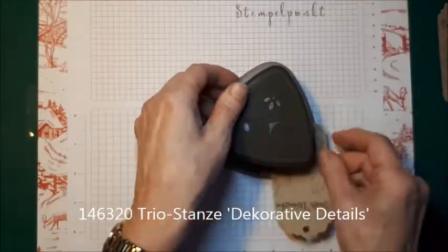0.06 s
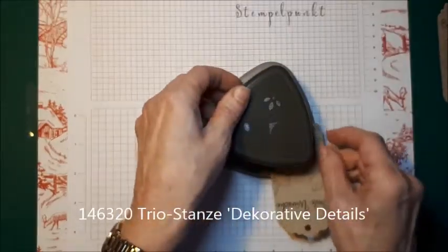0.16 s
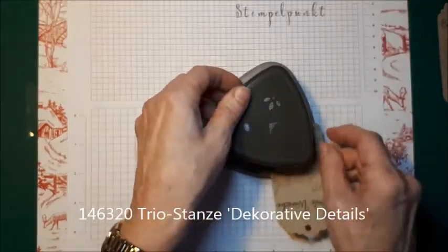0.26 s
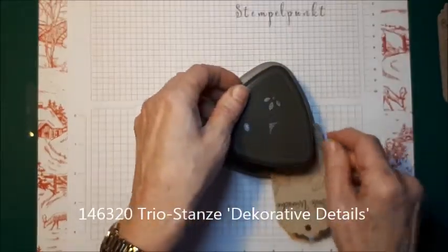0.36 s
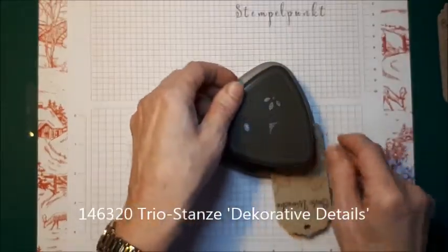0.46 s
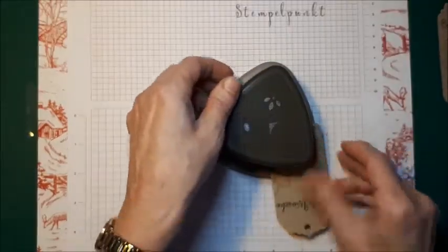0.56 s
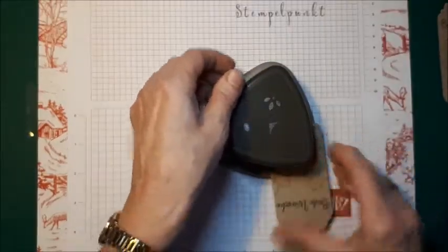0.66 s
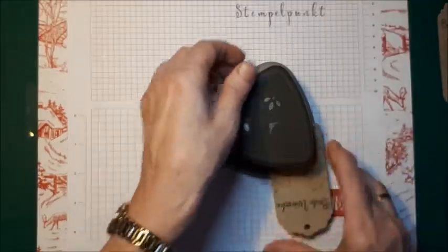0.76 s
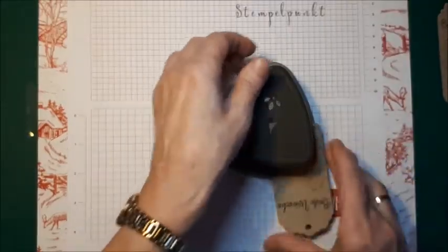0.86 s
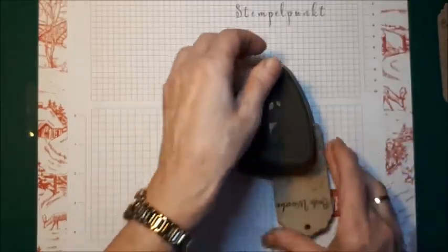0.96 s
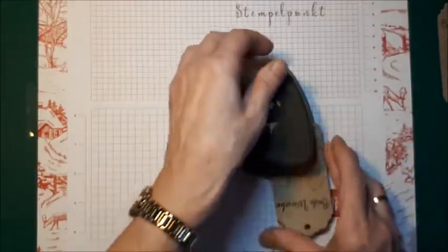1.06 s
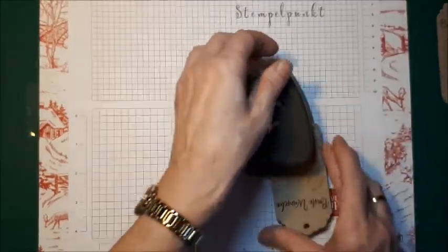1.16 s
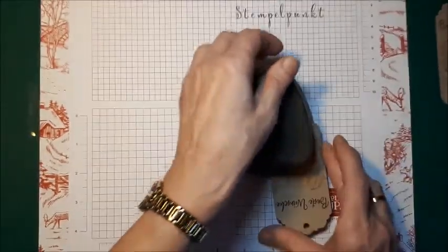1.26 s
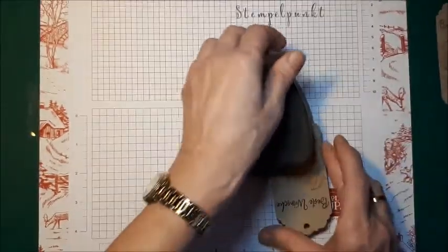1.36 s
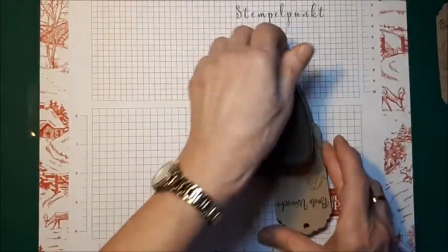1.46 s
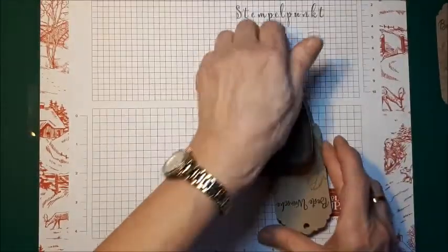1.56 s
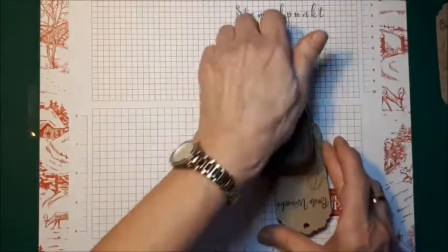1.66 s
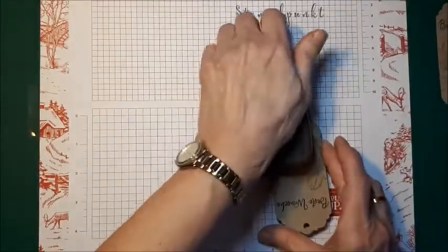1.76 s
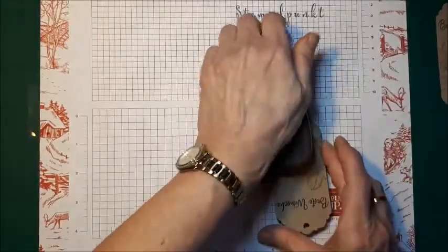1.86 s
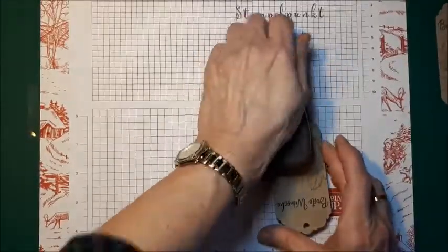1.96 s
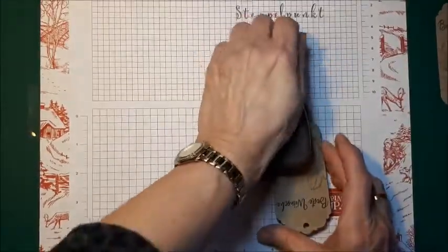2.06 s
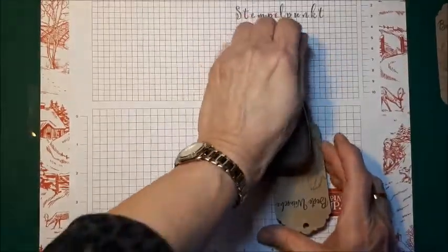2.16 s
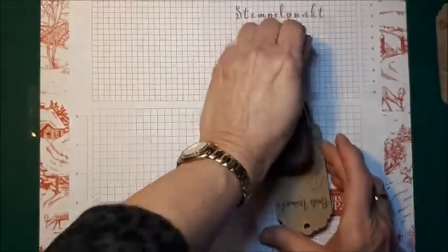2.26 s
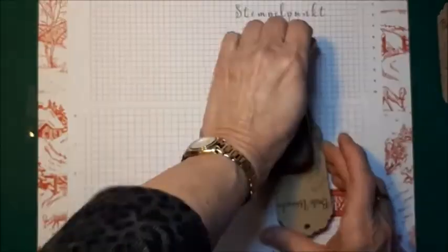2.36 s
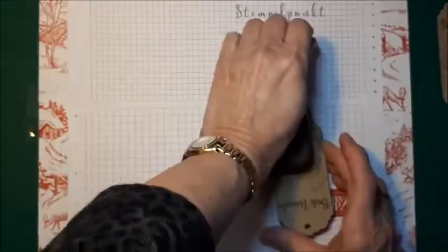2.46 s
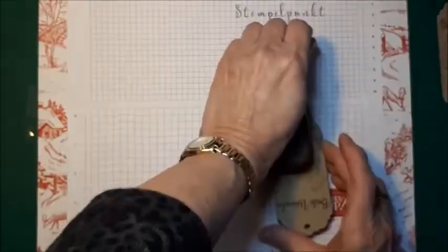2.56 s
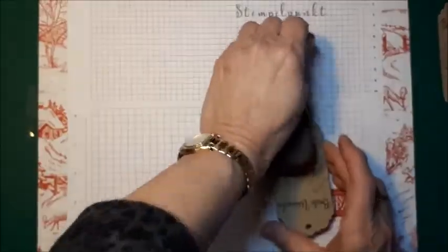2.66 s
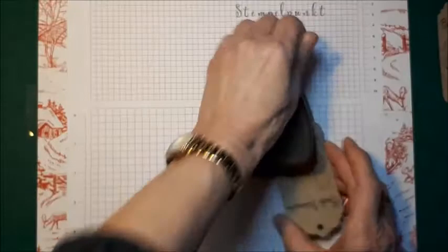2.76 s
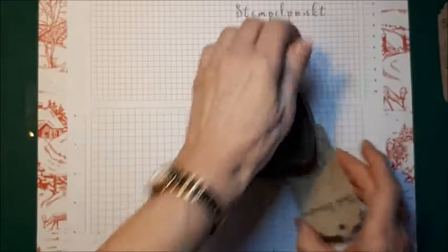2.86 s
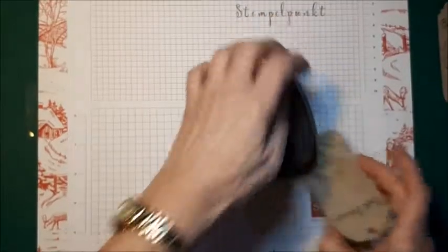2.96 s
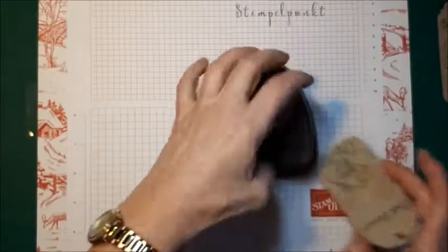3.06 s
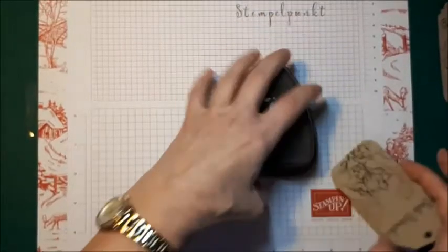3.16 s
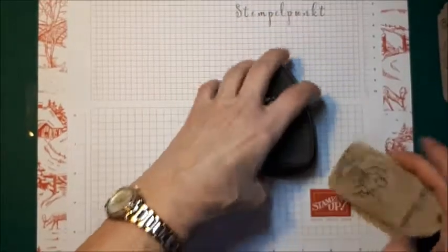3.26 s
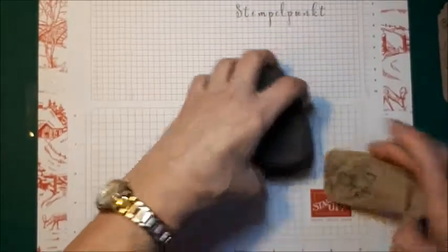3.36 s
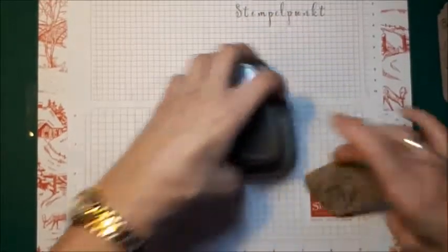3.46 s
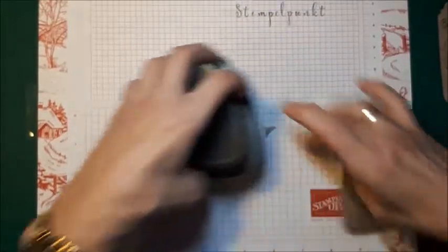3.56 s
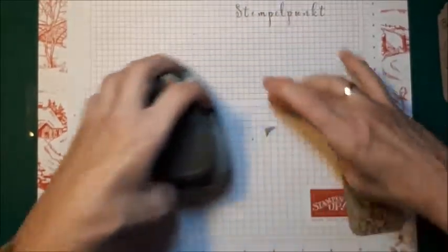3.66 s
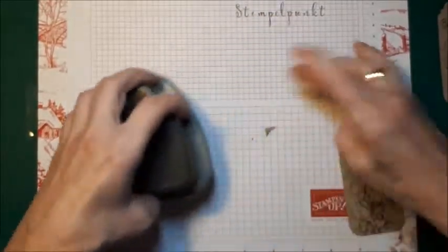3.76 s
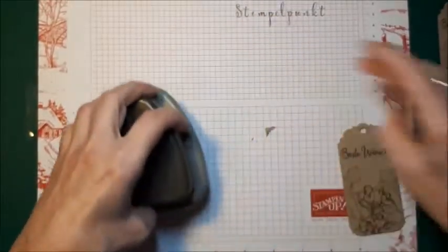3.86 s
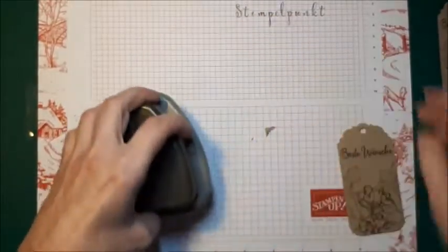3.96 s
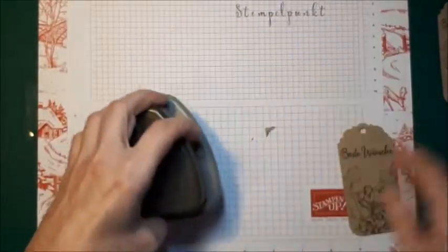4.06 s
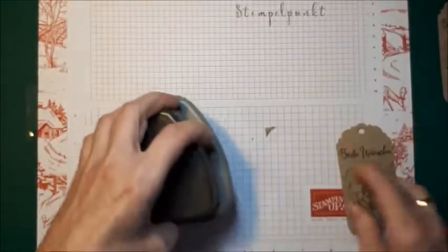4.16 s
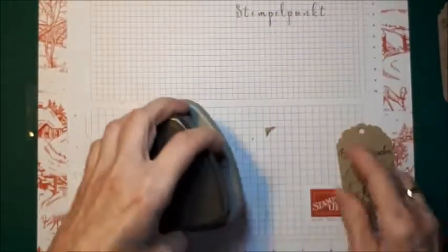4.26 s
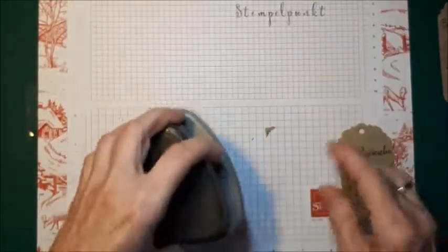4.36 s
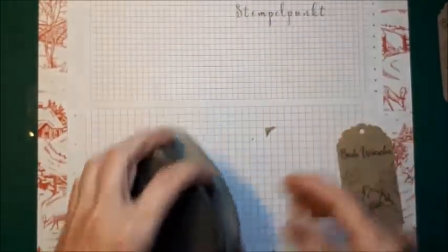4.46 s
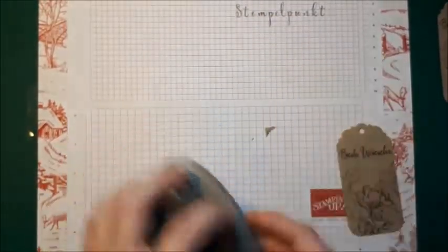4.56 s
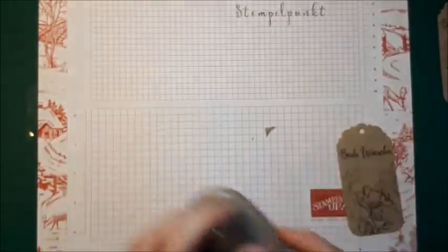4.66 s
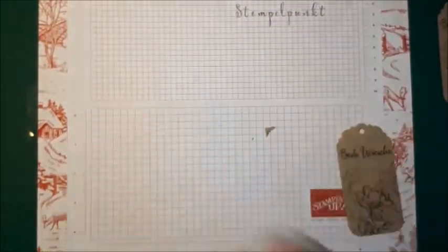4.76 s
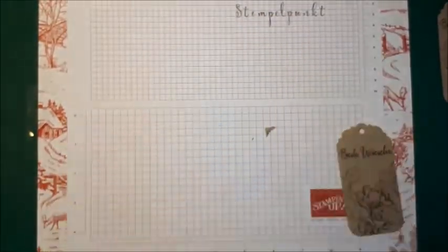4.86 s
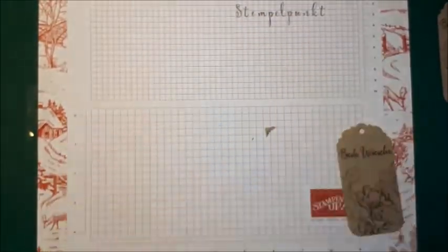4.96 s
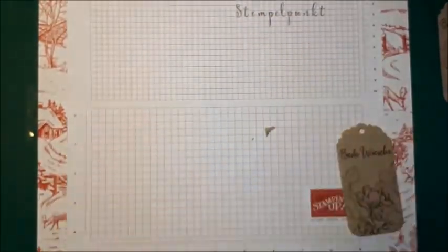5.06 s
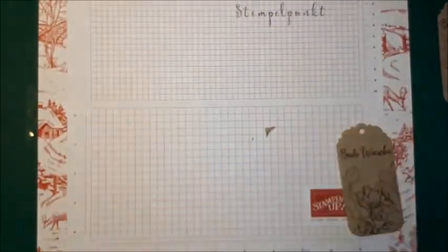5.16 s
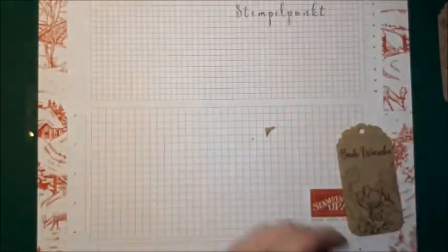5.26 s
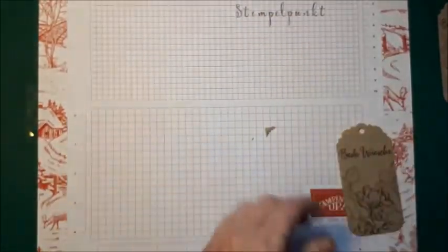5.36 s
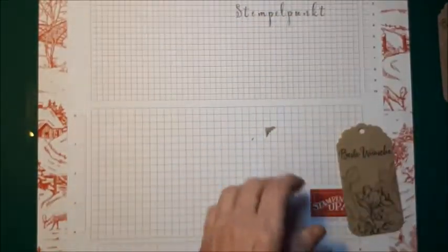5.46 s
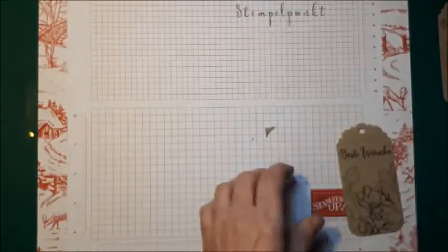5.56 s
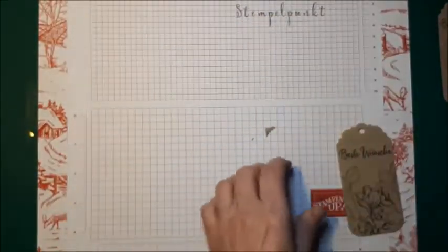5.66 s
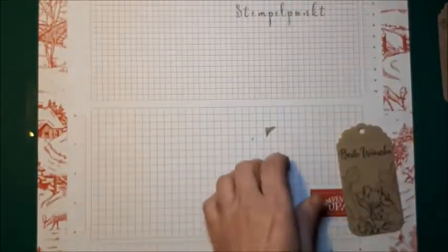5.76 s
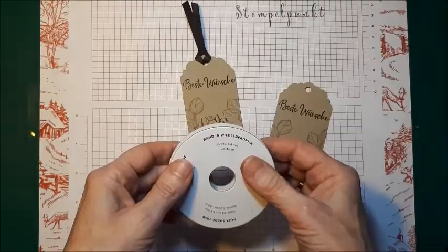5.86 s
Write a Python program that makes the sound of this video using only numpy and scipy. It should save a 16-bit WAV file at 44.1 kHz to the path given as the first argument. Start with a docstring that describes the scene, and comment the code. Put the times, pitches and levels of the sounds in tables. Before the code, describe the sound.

A card tag scuffs lightly on a paper pad. A hand presses a plastic corner punch, whose lever creaks in quickening, knocking jerks until the steel die snaps through the card with a brief ring. The lever springs back with a click. Card, punch and hands then tap, slide and rub softly on the padded table, all close to the microphone in a quiet, faintly humming room.

```python
"""Light scuffs and taps of a card tag on a paper pad, close by. A hand then presses a plastic corner punch:
the lever creaks and slips in jerks that knock the shell, the steel die snaps through the card and rings,
the spring sings and returns. Card, punch and hands scuff and tap the padded table again, and the punch's
cavity rubs over cloth with a rising hollow note. A quiet room hums underneath."""
import sys
import numpy as np
from scipy import signal
from scipy.fft import rfft, irfft, next_fast_len
from scipy.io import wavfile
from scipy.ndimage import map_coordinates

SR = 44100
rng = np.random.default_rng(int(sys.argv[2]) if len(sys.argv) > 2 else 0)


def transcribe(signal):
    """Save signal, clipped to [-1, 1], as a 16-bit WAV file at the path in sys.argv[1]."""
    frames = np.atleast_2d(signal).T
    limited = np.clip(frames, -1, 1)
    pcm = np.round(limited * 32767).astype(np.int16)
    wavfile.write(sys.argv[1], SR, pcm)


N = 260190

# lever slips: t/s, level/dB, knock f/Hz, decay/cycles, crack/dB, rattle/dB (last two re level)
LEVER_JERKS = [(1.4888, -49, 370, 1.2, -18.5, -16), (1.5501, -42.5, 440, 1.7, -26, -21),
               (1.6163, -51, 290, 1.4, -32, -9), (1.7674, -41.5, 310, 0.69, -26, -6),
               (1.7902, -28.5, 890, 1.25, -19, -10), (1.818, -34, 975, 2, -27, 0.5),
               (1.9124, -41.5, 530, 2.9, -15, -5), (1.9502, -26.5, 770, 0.73, -26, -1.5),
               (1.9659, -38, 505, 2.1, -16, 8.5), (2.015, -16.5, 753, 2.1, -16.5, -14.5),
               (2.0663, -23, 780, 0.88, -32.5, -8.5), (2.0823, -25, 450, 1, -30.5, -11),
               (2.1077, -12.5, 756, 1.36, -19.5, -11), (2.1268, -26, 725, 1.3, -20, -13.5),
               (2.132, -17.5, 685, 1.2, -13.5, -14), (2.1776, -11.5, 737, 1.9, -17.5, -17.5),
               (2.2155, -9.5, 785, 1.5, -16, -9), (2.2222, -14.5, 490, 1.05, -8, -18),
               (2.2266, -23.5, 160.7, 1.3, -14.5, -13), (2.2543, -8.5, 860, 1.1, -13, -11.5),
               (2.2672, -23, 600, 1.3, -9, -9.5), (2.2754, -15, 754, 1.6, -15, -12.5),
               (2.2919, -20, 450, 0.96, -9, -5), (2.2959, -12.5, 392.4, 4, -13.5, -17.5),
               (2.3166, -20, 546, 1.7, -8, -12), (2.3193, -8.5, 414, 1.3, -25, -23),
               (2.3294, -14, 412, 0.88, -2.5, -4.5), (2.3344, -15, 556, 1.5, -11.5, -4),
               (2.3421, -13, 404, 1.3, -8, -2.5), (2.3474, -12.5, 750, 1.8, -11.5, -11.5),
               (2.4754, -33, 977, 1.3, -15, -14.5), (2.5079, -51.5, 988, 1.3, -5.5, -1.5),
               (2.6156, -45.5, 930, 3, -16, 2), (2.6627, -19, 818, 3.1, 1.5, -9.5),
               (2.6808, -26.5, 830, 8.4, -2.5, -9)]
# treble of the jerks as the die bites: t/s, fizz/dB re crack
BITE_FIZZ = [(1.6, 7), (1.78, -20.5), (2.1, -15), (2.18, -1), (2.26, -13), (2.32, -6), (2.5, -11),
             (2.62, 3), (2.665, -18.5), (2.68, -28)]
# palm on the lever: t/s, card tearing/dB, table rumble/dB, shell groan/dB
PALM_PRESS = [(1.7, -86, -57, -73), (1.79, -79, -63, -61), (1.84, -65, -62, -65.5),
              (1.95, -62.5, -60.5, -41.5), (2.04, -70, -57, -69), (2.19, -56, -42, -72.5),
              (2.25, -65.5, -36, -53.5), (2.3, -46, -39.5, -24), (2.4, -61.5, -38.5, -55.5),
              (2.46, -67, -89, -98), (2.68, -89, -44.5, -46.5), (2.81, -65, -76, -93)]
# singing spring: t/s, level/dB
SPRING_LEVELS = [(2.36, -49), (2.384, -48), (2.454, -66), (2.482, -55), (2.534, -73), (2.598, -69),
                 (2.62, -60)]
# rubbed punch cavity: t/s, f/Hz, level/dB
CAVITY_GLIDE = [(5.06, 480, -64), (5.09, 546.5, -45), (5.108, 578, -59), (5.125, 620, -47.5),
                (5.14, 622, -53), (5.155, 688, -46.5), (5.18, 830, -62), (5.21, 990, -58)]
# blows on the pad: t/s, level/dB, knock f/Hz, decay/cycles, crack/dB, rattle/dB, fizz/dB (last 3 re level)
PAD_TAPS = [(.181, -51, 800, 3.8, 10.5, -15, -1), (.467, -49, 750, 2.3, -19, -5.5, -5),
            (.524, -64.5, 704, 1.6, 0, -5, 1), (2.8866, -51, 606, 1.3, 5.5, -15, 2.5),
            (2.937, -35.5, 847, 2.8, 1.5, -13, -8), (3.235, -44, 875, 2.8, 5, -6, -6),
            (3.36, -37.5, 408, 2.2, -8, -8.5, -22), (3.427, -64, 158, 1.2, 10, -12, 3),
            (3.497, -38, 493, 10.4, -12, -5, -12), (3.539, -63, 200, 1.5, -15, -18, 7.5),
            (3.556, -39.5, 136, 0.61, -29, -26, -2), (3.589, -53, 219, 2.4, -8, -13, 12),
            (4.114, -48, 231, 1.8, -15, -1.5, -7.5), (4.273, -48.5, 254, 1.98, -31.5, -14, -24.5),
            (4.57, -59.5, 229, 2.2, -12.5, -2, 6.5), (4.63, -56, 233, 4.6, 2, -4, -5),
            (4.769, -55, 405, 2.2, -13, -7, -11), (4.838, -37, 149, 0.91, -23, -10, -19),
            (4.867, -43, 227, 2, -5.5, -4.5, -14), (4.907, -39, 108, 1.4, -21, -20, -31),
            (4.96, -36, 131, 0.83, -20, -32, -28), (5.054, -50, 223, 2.9, -9, -4, -24),
            (5.394, -35.5, 343, 0.97, -15, -2.5, -6.5), (5.406, -37, 340, 1, -24, -3, -15.5),
            (5.422, -41, 221, 1.7, -27, -5, -12), (5.435, -45, 290, 1.2, -4, -33, 10),
            (5.51, -44.5, 188, 1.6, -7.5, -8, -13), (5.56, -49, 260, 2.1, -25, -5, -25.5),
            (5.618, -48, 280, 2.1, -14.5, -7.5, -25), (5.775, -52, 120.8, 2.8, -16, -4, -22.5)]
# card catching: t/s, length/s, edge/dB, flap/dB, hiss/dB
CARD_SCUFFS = [(0.058, 0.099, -64.5, -74, -69.5), (0.136, 0.069, -61.5, -71, -73),
               (0.193, 0.073, -75, -85, -94), (0.371, 0.093, -64.5, -67.5, -66),
               (0.446, 0.05, -59, -67, -84), (0.592, 0.14, -76, -70.5, -78), (0.819, 0.026, -77, -82, -77),
               (0.838, 0.16, -83.5, -92, -79), (0.967, 0.11, -80, -75, -88),
               (2.623, 0.049, -58, -55.5, -59.5), (2.786, 0.041, -65, -75, -88),
               (2.85, 0.023, -57, -67, -64), (2.877, 0.085, -51.5, -54.5, -65),
               (2.936, 0.078, -65, -58.5, -70), (3.286, 0.04, -54, -56, -64), (3.354, 0.032, -70, -52, -76),
               (3.365, 0.052, -61.5, -54, -62.5), (3.419, 0.023, -67, -64, -66),
               (3.49, 0.022, -45, -47.5, -50), (3.598, 0.087, -78, -66, -74), (4.107, 0.033, -78, -67, -60),
               (4.121, 0.12, -86, -80, -64), (4.558, 0.069, -79, -69, -66), (4.645, 0.32, -76, -88, -64.5),
               (5.108, 0.044, -66.5, -59.5, -81), (5.861, .035, -86, -75, -90)]
# hands moving over the pad: t/s, drag/dB, table rumble/dB
HAND_MOVES = [(0.0, -81, -67.5), (0.57, -83, -69), (1.08, -87, -66), (1.23, -89, -71.5), (1.5, -85, -64),
              (2.6, -87.5, -67.5), (2.84, -60, -63), (2.99, -77, -58.5), (3.24, -73, -62.5),
              (3.43, -75, -59.5), (3.6, -68.5, -56.5), (3.66, -84, -65), (4.06, -68, -55.5),
              (4.34, -83.5, -68.5), (4.55, -84, -66.5), (4.77, -55.5, -55.5), (4.95, -70, -53.5),
              (5.14, -63.5, -64), (5.34, -70, -57.5), (5.44, -61.5, -55), (5.59, -74.5, -54),
              (5.75, -80, -63.5), (5.9, -76.5, -61)]
# ring of the freed die: f/Hz, relative level/dB, t60/s
DIE_RING = [(1740, -1, .28), (2500, -5, .22), (2850, -4, .3), (3350, -11, .28), (4075, -10, .24)]
# room decay: f/Hz, t60/s
ROOM_DECAY = [(150, 0.31), (1000, 0.2), (8000, 0.28)]

# resonances: f/Hz, width/Hz, relative level/dB
SHELL_MODES = [(196, 99, -3.5), (432, 220, 0.5), (824, 310, -3.5), (986, 110, -1), (1366, 340, -12.5)]  # plastic punch shell
DIE_MODES = [(1050, 410, -6.5), (1815, 410, -4), (2370, 270, -2), (2880, 220, -9), (4050, 670, -13)]  # die in its guide
SLOT_MODES = [(747, 710, 0)]  # air in the punch's slot
EDGE_MODES = [(3756, 960, 0), (4300, 650, 1.5), (5370, 1240, -6.5), (7790, 1800, -15)]  # card's stiff edge
FLAP_MODES = [(1810, 330, 3), (2270, 430, 2), (3017, 350, -1)]  # card's free end

# noise spectra: f/Hz, relative level/dB
FIZZ_SPECTRUM = [(1760, -24.5), (3000, 3.5), (3380, -14.5), (5480, -1), (9010, -12.5), (12900, -19),
                 (16400, -30)]  # treble of a jerk
CARD_SPECTRUM = [(710, -37), (1200, -10), (1780, 0), (2220, -1), (2420, 0), (3030, -2.5), (4080, -7),
                 (4700, -11.5), (6500, -12.5), (8450, -39.5), (14300, -120)]  # card scrape
PAPER_SPECTRUM = [(2650, -35.5), (4500, -3), (9480, -3.5), (10600, -10.5), (15100, -14), (16000, -32),
                  (16400, -27)]  # paper hiss
TABLE_SPECTRUM = [(15, -56.5), (25, -23), (60, -11), (108, -2.5), (178, -1.5), (231, -8.5), (300, -9.5),
                  (390, -50.5), (660, -120)]  # table rumble
FLOOR_SPECTRUM = [(13, -50.5), (22, -33.5), (37, -15.5), (58, -7), (190, -8.5), (228, -8.5), (260, -14),
                  (322, -15), (1000, -38.5), (1120, -31.5), (1320, -42), (3380, -47.5), (9670, -35.5),
                  (16400, -47)]  # room and microphone noise


def lever():
    """The lever sticks and slips; each jerk knocks the shell and cracks the die against its guide."""
    bite_s, bite_db = np.transpose(BITE_FIZZ)
    jerks = [(s, db, hz, cycles, crack_db, rattle_db, crack_db + np.interp(s, bite_s, bite_db))
             for s, db, hz, cycles, crack_db, rattle_db in LEVER_JERKS]
    return blows(jerks, DIE_MODES, FIZZ_SPECTRUM, stop_cycles=8.3, rise_cycles=0.69, lag_s=0.0006,
                 crack_t60_s=0.023, rattle_rise_s=0.0045, rattle_t60_s=0.085, click_gain=0.6)


def die(snap_s=2.33, ring_db=-38):
    """The steel die rings briefly once through the card, each mode wavering in level."""
    out, t = np.zeros(N), np.arange(SR // 2) / SR
    for hz, mode_db, t60_s in DIE_RING:
        envelope = amp(ring_db + mode_db - 60 * t / t60_s + 1.2 * wobble(90)[:len(t)])
        add(out, snap_s, envelope * np.sin(2 * np.pi * hz * t))
    return out


def spring(pitch_hz=1000):
    """The compressed spring sings faintly while the lever is held down."""
    db, = curves(SPRING_LEVELS)
    tone = np.sqrt(2) * np.sin(phase(pitch_hz + 6 * wobble(80)))
    return gate(SPRING_LEVELS, fade_s=0.02) * amp(db + 1.5 * wobble(54)) * tone


def cavity():
    """Cloth rubs the punch's cavity: a rising noise band, with a weaker, wider one above."""
    hz, db = curves(CAVITY_GLIDE)
    bands = noise_band(hz, rate_hz=330) + amp(-11) * noise_band(2.2 * hz, rate_hz=1100)
    return gate(CAVITY_GLIDE, fade_s=0.015) * amp(db) * bands


def taps():
    """Card, punch and fingertips strike the pad; the card cracks and the paper fizzes."""
    return blows(PAD_TAPS, FLAP_MODES + EDGE_MODES, PAPER_SPECTRUM, stop_cycles=18, rise_cycles=0.71,
                 lag_s=0.0012, crack_t60_s=0.0053, rattle_rise_s=0.0023, rattle_t60_s=0.057,
                 click_gain=1.12)


def blows(rows, crack_modes, fizz_spectrum, stop_cycles, rise_cycles, lag_s,
          crack_t60_s, rattle_rise_s, rattle_t60_s, click_gain):
    """Each blow: a brief knock, then crack and fizz; loose parts rattle on in shell, crack and fizz."""
    out, t = np.zeros(N), np.arange(SR // 4) / SR
    responses = resonant(SHELL_MODES, steep=0.25), resonant(crack_modes, steep=0.43), coloured(fizz_spectrum)
    shell_noise, crack_noise, fizz_noise = [noise(r, grain_db=2.3, grain_hz=500) for r in responses]
    crack_click = click_gain * click(resonant(crack_modes, steep=0.3))
    fizz_click = click_gain * click(coloured(fizz_spectrum))
    burst = 0.86 * amp(-60 * t / crack_t60_s) * (1 - np.exp(-t / 0.00023))
    rattle_envelope = amp(-60 * t / rattle_t60_s) * (1 - np.exp(-t / rattle_rise_s))
    for s, db, hz, decay_cycles, crack_db, rattle_db, fizz_db in rows:
        offset = rng.integers(N - len(t))
        cut = slice(offset, offset + len(t))
        cycles = t * hz
        rise = 1 - np.exp(-(cycles / rise_cycles) ** 2)
        decay = np.exp((rise_cycles - cycles) / decay_cycles)
        palm_damping = np.exp(-(cycles / stop_cycles) ** 6)
        knock = rise * decay * palm_damping * np.sin(2 * np.pi * cycles)
        rattle = amp(rattle_db) * rattle_envelope
        crack = amp(crack_db) * (crack_click + (burst + rattle) * crack_noise[cut])
        fizz_envelope = 0.31 * burst + rattle * amp(-60 * t / 0.3)
        fizz = amp(fizz_db) * (fizz_click + fizz_envelope * fizz_noise[cut])
        add(out, s, amp(db) * knock)
        # the part lets go once the force has built up
        add(out, s + lag_s, amp(db) * (rattle * shell_noise[cut] + crack + fizz))
    return out


def scuffs(slot_under_flap_db=3.5):
    """The card catches for a moment: a swell of dense grains in edge, flap, slot and paper."""
    responses = (resonant(EDGE_MODES, steep=0.5), resonant(FLAP_MODES, steep=0.33),
                 resonant(SLOT_MODES), coloured(PAPER_SPECTRUM))
    grains = np.array([noise(r, grain_db=2.53, grain_hz=650) for r in responses])
    envelopes = np.zeros_like(grains)
    for s, length_s, edge_db, flap_db, hiss_db in CARD_SCUFFS:
        swell = signal.windows.tukey(round(length_s * SR), 0.7)
        for envelope, db in zip(envelopes, (edge_db, flap_db, flap_db - slot_under_flap_db, hiss_db)):
            add(envelope, s, amp(db) * swell)
    return np.sum(envelopes * grains, axis=0)


def hands(drag_ref_db=-70, rumble_ref_db=-60):
    """Skin, card and plastic drag over the pad; pressure makes the shell creak and the table rumble."""
    drag_db, rumble_db = curves(HAND_MOVES)
    tear, thrust, groan = gate(PALM_PRESS, fade_s=0.014) * amp(curves(PALM_PRESS))
    creak_db = -65.5 + 0.66 * (drag_db - drag_ref_db) + 0.45 * (rumble_db - rumble_ref_db)
    hiss_db = -74.5 + 0.6 * (drag_db - drag_ref_db)
    uneven_drag = amp(1.6 * wobble(35))
    rumble = np.hypot(amp(rumble_db), thrust) * noise(coloured(TABLE_SPECTRUM), 4.8, grain_hz=40)
    creak = np.hypot(amp(creak_db), groan) * noise(resonant(SHELL_MODES), 1.5, grain_hz=150)
    scrape = np.hypot(amp(drag_db), tear) * noise(coloured(CARD_SPECTRUM), 0.85, grain_hz=300)
    hiss = np.hypot(amp(hiss_db), amp(-10) * tear) * noise(coloured(PAPER_SPECTRUM), 2, grain_hz=450)
    return rumble + uneven_drag * (creak + scrape + hiss)


def room(x):
    """Reverberation: a noise tail in which each frequency dies at its own rate."""
    hz, t, spectra = signal.stft(rng.standard_normal(SR // 2), SR, nperseg=256)
    decay = amp(-60 * t / log_interp(ROOM_DECAY, hz)[:, None])
    _, tail = signal.istft(spectra * decay, SR, nperseg=256)
    delayed = np.pad(x, (250, 0))
    return signal.fftconvolve(delayed, tail / np.linalg.norm(tail))[:N]


def background(hum_hz=227, hum_db=-67.5, floor_db=-71):
    """Steady room and microphone noise with a faint wavering hum."""
    envelope = np.sqrt(2) * amp(hum_db + 1.8 * wobble(28))
    hum = envelope * np.sin(phase(hum_hz + 1.5 * wobble(12)))
    return amp(floor_db) * noise(coloured(FLOOR_SPECTRUM)) + hum


def amp(db):
    """Gain of a dB value."""
    return 10 ** (np.asarray(db) / 20)


def unit_rms(x):
    """x at rms 1."""
    return x / np.sqrt(np.mean(x ** 2) + 1e-20)


def phase(hz):
    """Running phase/rad of a varying frequency."""
    return 2 * np.pi * np.cumsum(hz) / SR


def log_interp(points, hz):
    """Interpolate (f/Hz, value) points on a log frequency axis."""
    f, values = np.transpose(points)
    return np.interp(np.log(hz + 1), np.log(f + 1), values)


def curves(rows):
    """One value per sample for each column after t/s."""
    s, *columns = np.transpose(rows)
    return [np.interp(np.arange(N) / SR, s, column) for column in columns]


def gate(rows, fade_s):
    """1 between the first and last row's times, with soft ends."""
    t = np.arange(N) / SR
    return np.clip(np.minimum(t - rows[0][0], rows[-1][0] - t) / fade_s, 0, 1)


def wobble(rate_hz):
    """Smooth random curve, rate_hz knots a second."""
    knots = rng.standard_normal(int(N * rate_hz / SR) + 4)
    return map_coordinates(knots, [np.arange(N) * rate_hz / SR])


def filtered(x, response):
    """x through a complex frequency response."""
    size = next_fast_len(x.shape[-1] + 8192)
    hz = np.fft.rfftfreq(size, 1 / SR)
    return irfft(rfft(x, size) * response(hz), size)[..., :x.shape[-1]]


def resonant(modes, steep=0.14):
    """Response of resonances summed in alternating sign; steep lowers the skirts."""
    def response(f):
        total = sum((-1) ** k * amp(db) * 1j * f * width_hz / (hz * hz - f * f + 1j * f * width_hz)
                    for k, (hz, width_hz, db) in enumerate(modes))
        return total * np.abs(total) ** steep
    return response


def coloured(spectrum):
    """Zero-phase response of a spectrum."""
    return lambda hz: amp(log_interp(spectrum, hz))


def noise(response, grain_db=0, grain_hz=100):
    """Filtered noise of rms 1; its drive flutters by grain_db, like many small slips."""
    drive = rng.standard_normal(N) * amp(grain_db * wobble(grain_hz))
    return unit_rms(filtered(drive, response))


def noise_band(hz, rate_hz):
    """Noise of rms 1 around a moving pitch; rate_hz sets the width."""
    angle = phase(hz)
    return unit_rms(wobble(rate_hz) * np.sin(angle) + wobble(rate_hz) * np.cos(angle))


def click(response):
    """Impulse response, peak 1."""
    pulse = filtered(signal.unit_impulse(SR // 4, 20), response)
    return pulse / np.abs(pulse).max()


def add(track, s, sound):
    """Mix a sound in at time s."""
    part = track[round(s * SR):][:len(sound)]
    part += sound[:len(part)]


def scene(room_db=-12.5):
    """Mono mix: sounds on the table, their reverberation, the background."""
    near = lever() + die() + spring() + cavity() + taps() + scuffs() + hands()
    return (near + amp(room_db) * room(near) + background())[None]


def record(dry, top_hz=15850):
    """Brick-wall low-pass at the band limit."""
    return filtered(dry, lambda hz: hz < top_hz)


dry = scene()
out = record(dry)
transcribe(out)
```